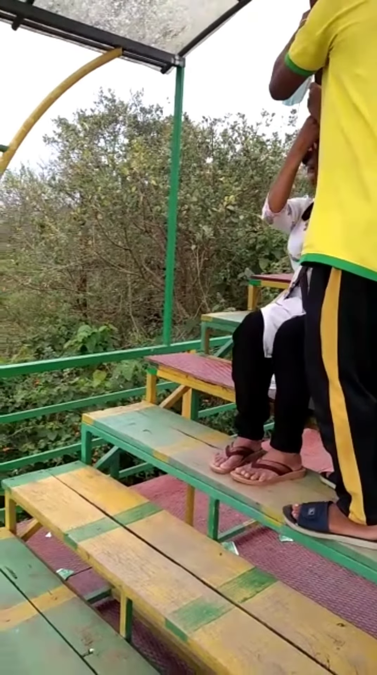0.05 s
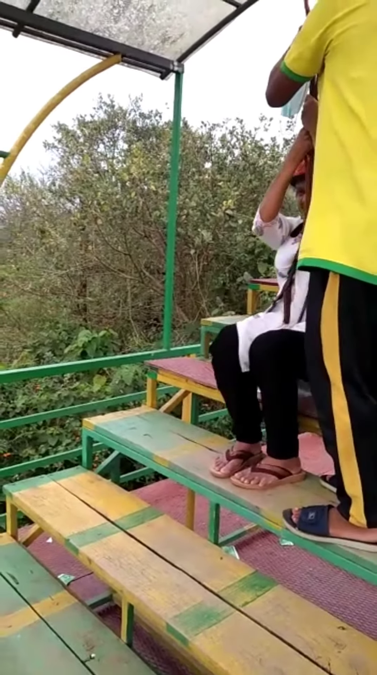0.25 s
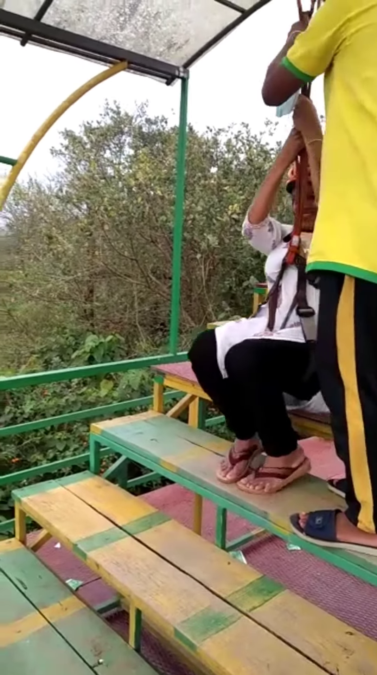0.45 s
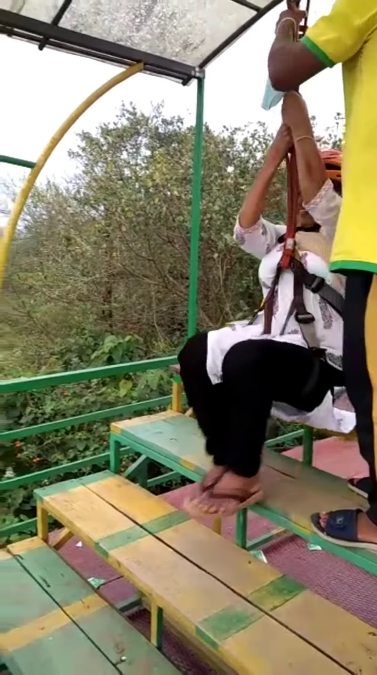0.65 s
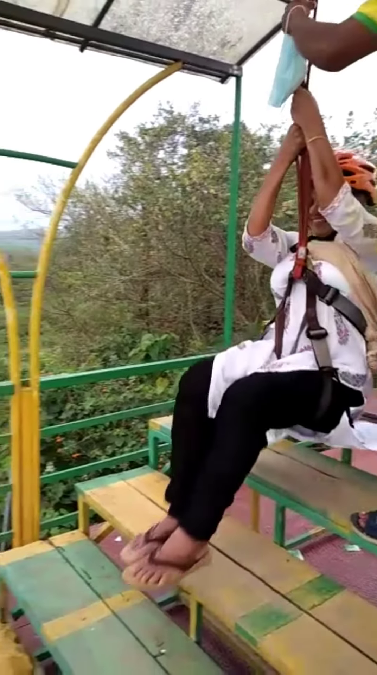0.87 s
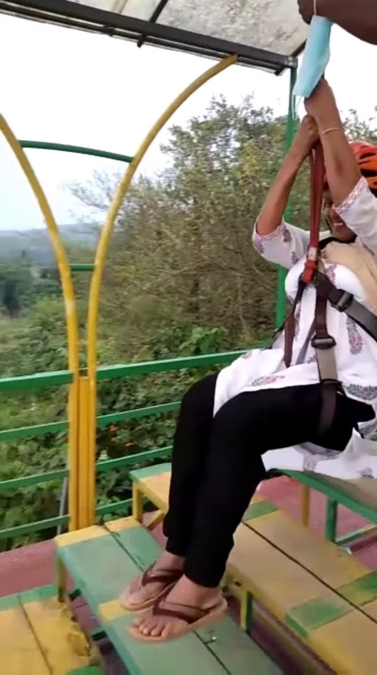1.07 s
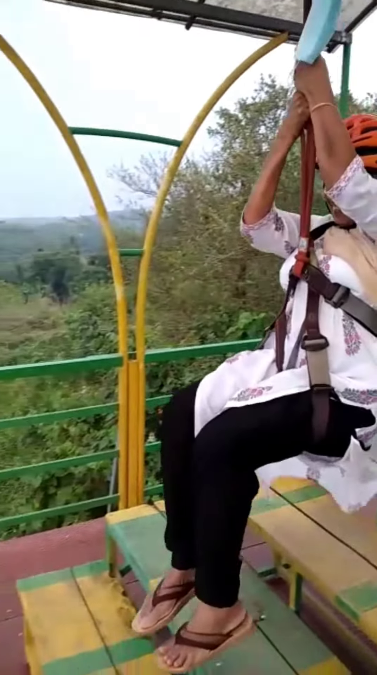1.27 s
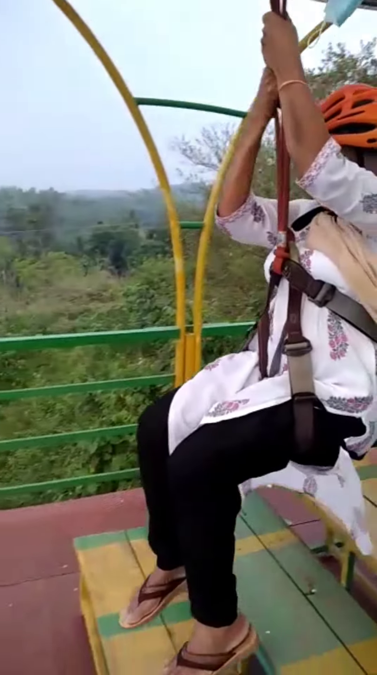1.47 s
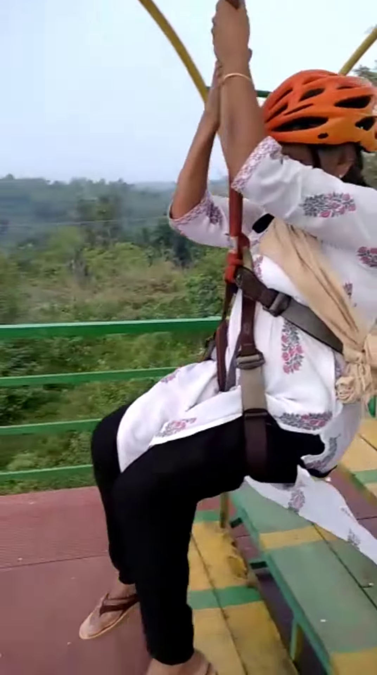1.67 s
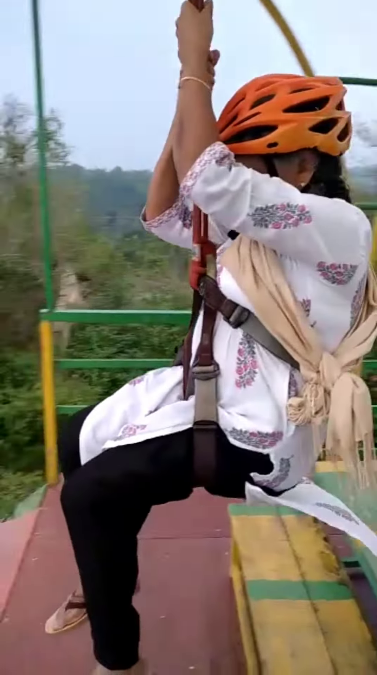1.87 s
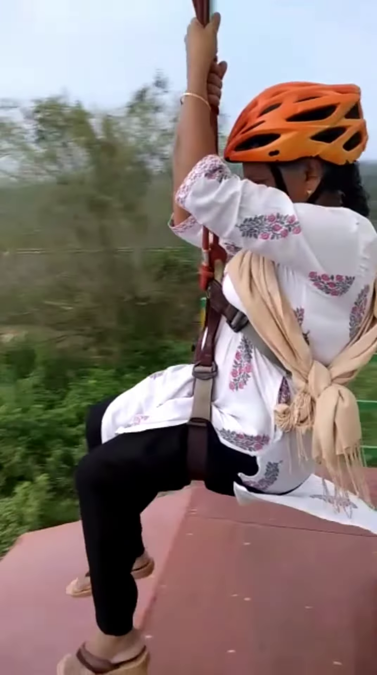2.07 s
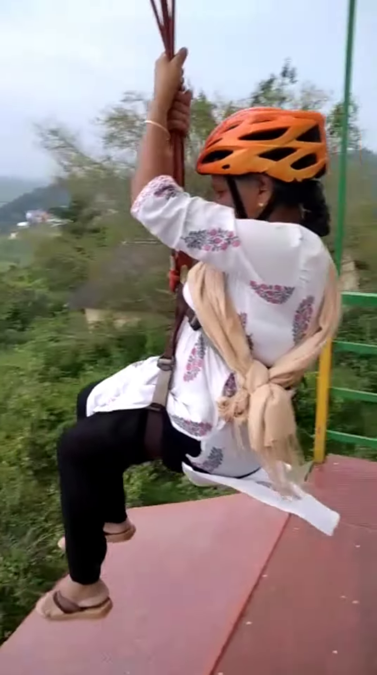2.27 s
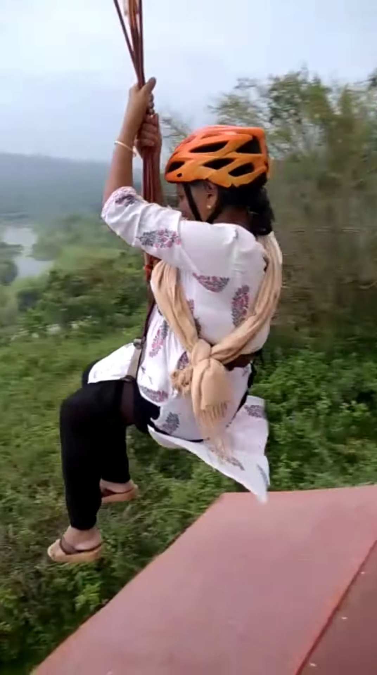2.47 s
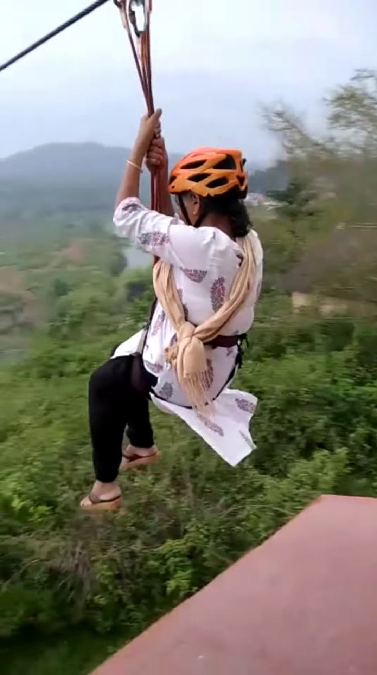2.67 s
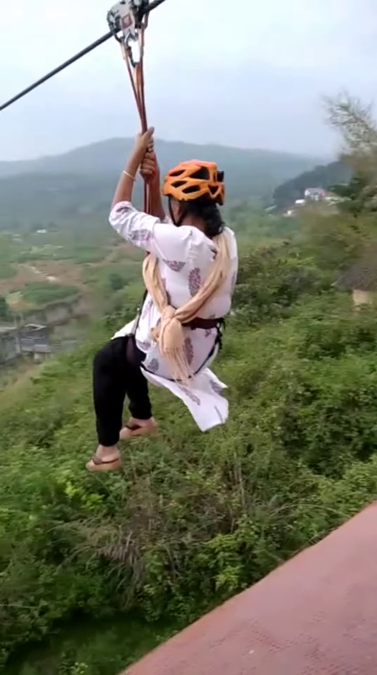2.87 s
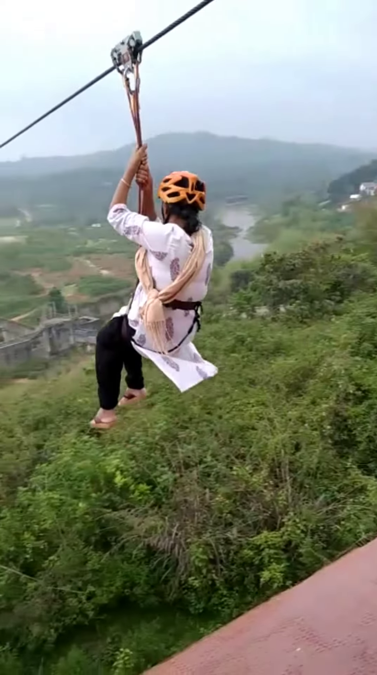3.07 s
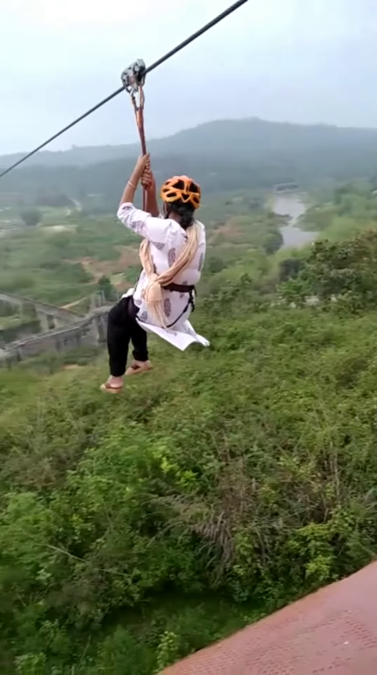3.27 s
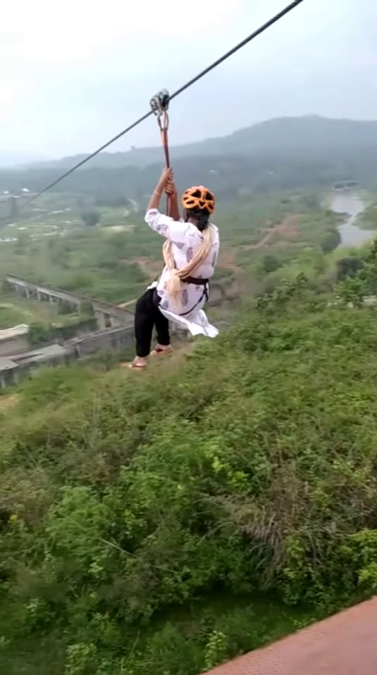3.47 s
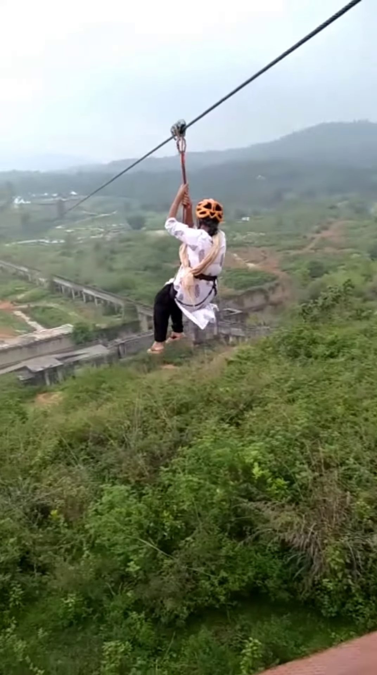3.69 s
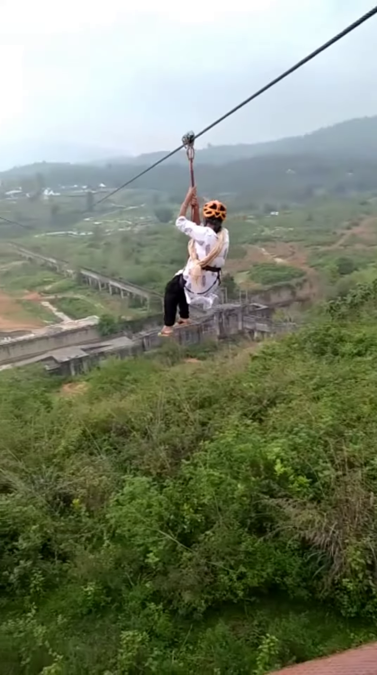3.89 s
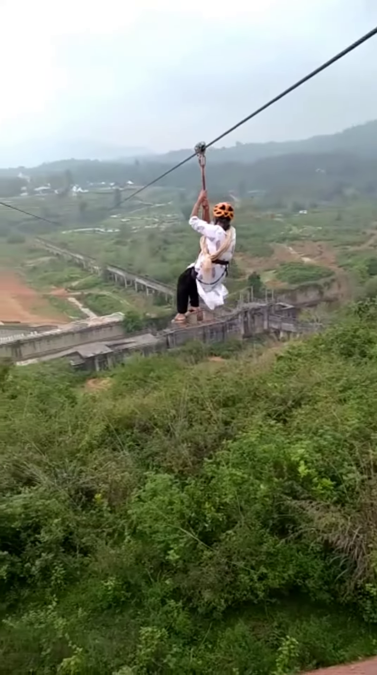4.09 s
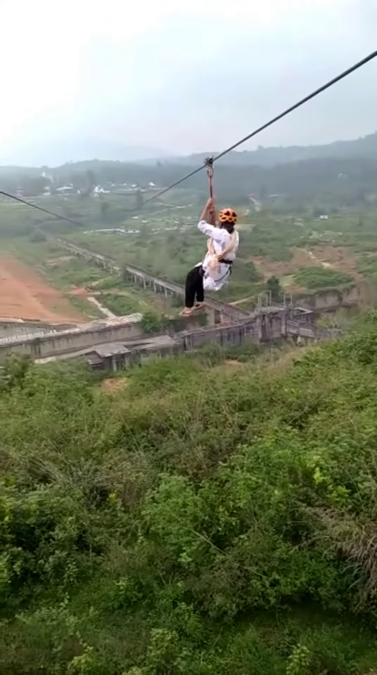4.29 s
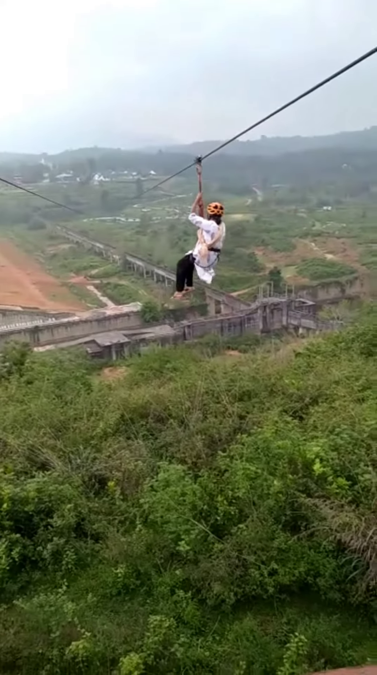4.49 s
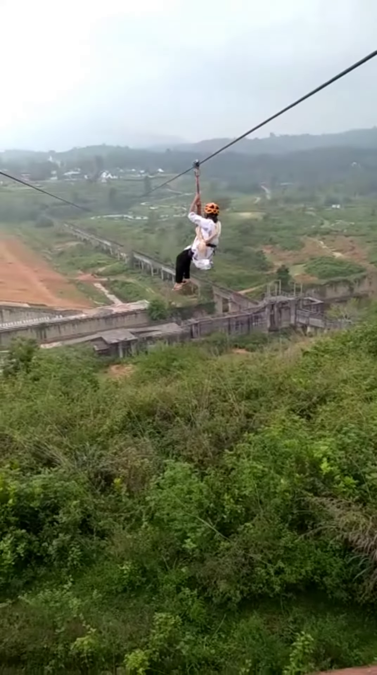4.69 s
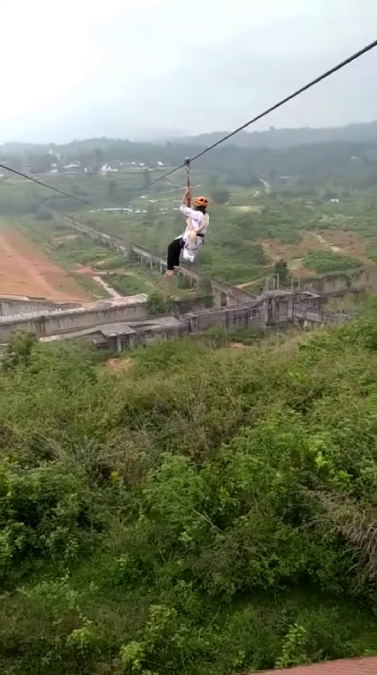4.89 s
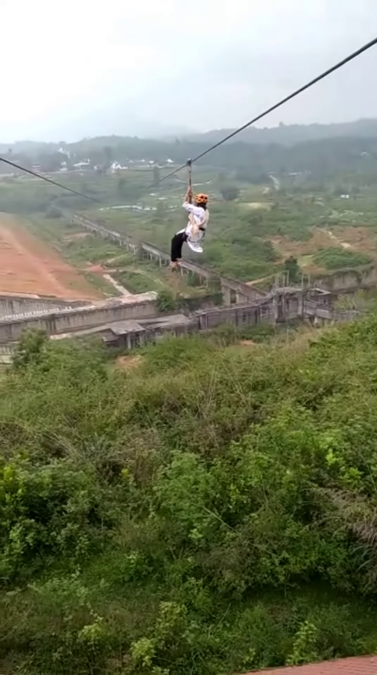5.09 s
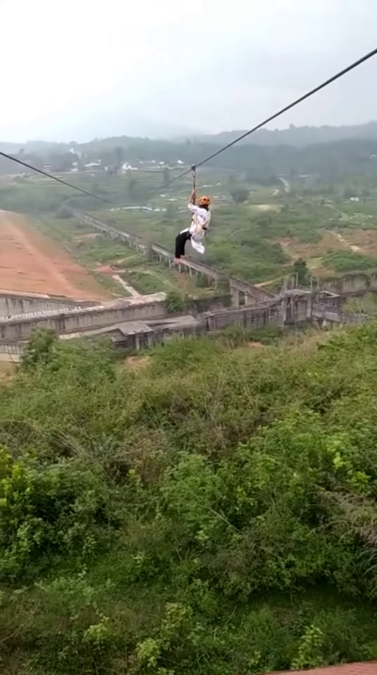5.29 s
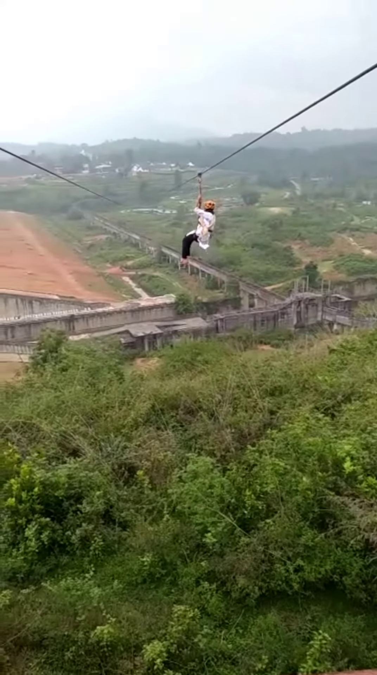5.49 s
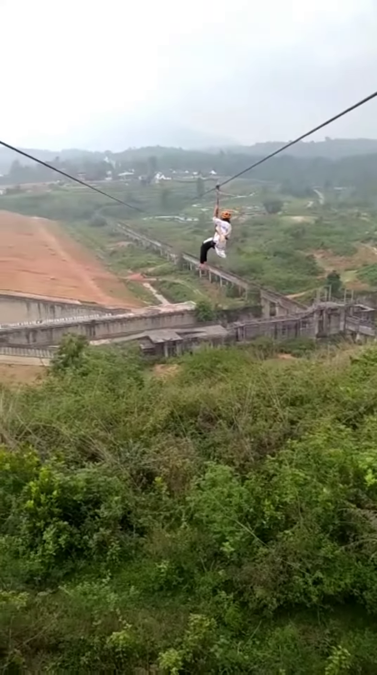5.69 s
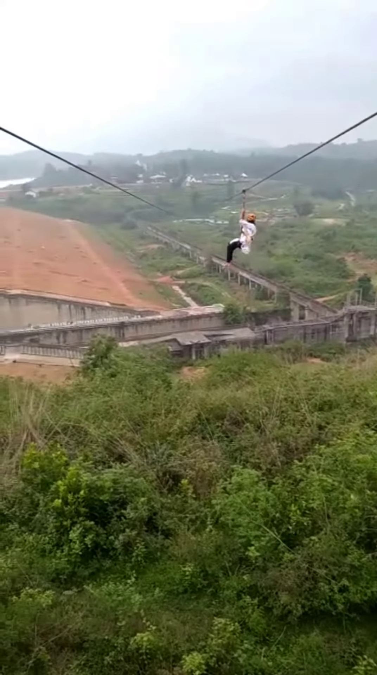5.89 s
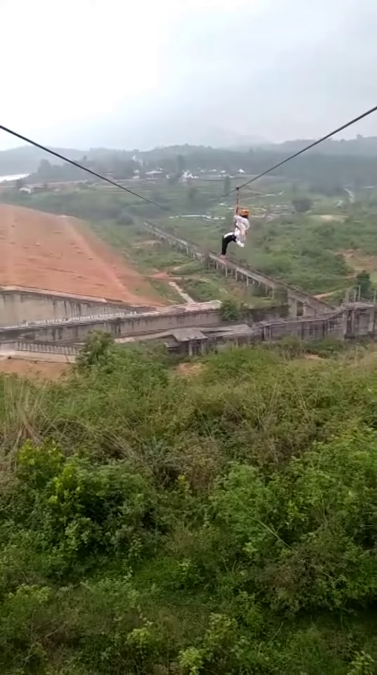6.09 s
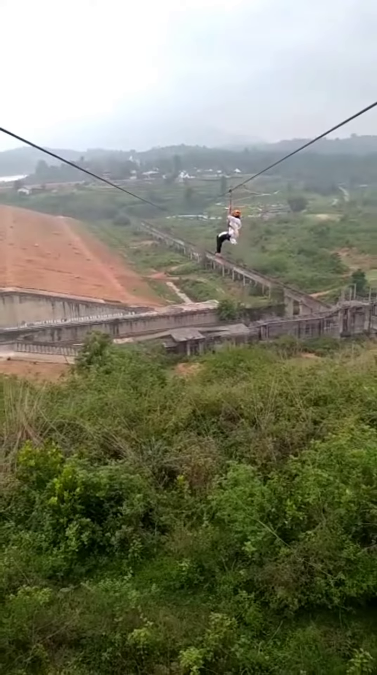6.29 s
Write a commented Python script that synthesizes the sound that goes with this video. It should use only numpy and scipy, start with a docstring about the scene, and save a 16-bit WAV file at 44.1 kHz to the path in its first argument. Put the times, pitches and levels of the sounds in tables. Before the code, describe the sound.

A zip line trolley ticks off along a steel cable, its ticks quickening into a bright metallic hiss that sings down the span, outdoors.

```python
"""Under a roofed platform, harness and clothes rustle, then a bird whistles one swooping phrase.
The zip line trolley rolls off: its sheaves tick over the strands of a steel cable, faster and faster.
Side plates and hanger ring as they pass the microphone at 1.1 m; soft knocks ring the modes of the deck.
The ticks merge into a hiss, coloured by cable resonances from ever farther down the span; a faint hum rises.
Throughout there is open air, a breeze gusting on the microphone, and insects as throbbing bands of noise."""
import sys
import numpy as np
from scipy import signal
from scipy.fft import rfft, irfft, next_fast_len
from scipy.io import wavfile
from scipy.ndimage import uniform_filter1d, map_coordinates

SR = 44100
rng = np.random.default_rng(int(sys.argv[2]) if len(sys.argv) > 2 else 0)


def transcribe(u):
    """Save the signal u as a 16-bit wav file named by the first command-line argument.

    u: samples, shape (n,) or (channels, n), limited to [-1, 1]; the rate is SR.
    q: integer samples, one column per channel.
    """
    v = np.clip(np.atleast_2d(u).T, -1, 1)
    q = np.round(v * 32767).astype(np.int16)
    wavfile.write(sys.argv[1], SR, q)


N = 279831

# All side_db values are left above right; a swell's length_s is taken at half height (in dB).
# Speed of the trolley, briefly checked just after the push-off: time_s, strands_per_s
SPEED = [(0.387, 20.7), (0.521, 53.3), (0.82, 76), (0.87, 53), (0.94, 55), (1.1, 107), (2.0, 173),
         (3.3, 289), (5.1, 415), (5.8, 434), (6.35, 480)]
# Where the hiss comes from: time_s, reach (0 trolley, 1 first stretch of cable, 2 far down the span)
REACH = [(0.5, 0.4), (1.8, 0.062), (2.15, 0.3), (2.5, 0.6), (3.2, 0.9), (4.0, 1.004), (4.6, 1.13),
         (5.5, 1.55)]
# Direction of the cable sound, on top of the sides of its colours: time_s, side_db
HEADING = [(0.5, -5), (1.3, -5), (2.2, -3), (2.8, -5), (3.5, -3), (4.3, -1.1), (5.2, -1.5), (6.3, -2)]
# Single hard contacts of sheave and strand: start_s, strength_db (before the crack and tail offsets)
HARD_CONTACTS = [(0.3862, -50), (0.4257, -66), (0.4585, -41.5), (0.48, -41), (0.501, -47), (0.5205, -39),
                 (0.544, -40), (0.56, -37), (0.5936, -36.5), (0.6267, -44), (0.658, -37), (0.675, -42),
                 (0.7189, -47), (0.747, -51), (0.7755, -52), (0.8028, -61), (0.831, -36), (0.8966, -52),
                 (0.9146, -48), (0.953, -40), (0.968, -40), (0.9845, -48), (1.0281, -37), (1.053, -33),
                 (1.0768, -31), (1.1, -33), (1.1908, -36), (1.47, -33), (2.283, -28), (2.614, -42),
                 (2.646, -35), (3.307, -41), (3.555, -33), (5.169, -37), (5.199, -29), (5.466, -32),
                 (5.9526, -37)]
# Colour of the steel at the three reaches, relative: frequency_hz, density_db (per Hz)
NEAR_COLOUR = [(1000, -14.5), (1550, -12.5), (2270, -5.5), (2480, 1), (2870, 4.5), (3100, 2), (3400, 3),
               (4300, 0), (5210, -4.5), (7570, 12.5), (8400, 18.5), (9610, 12), (14300, -0.5)]
MIDWAY_COLOUR = [(410, -26), (700, -25.5), (901, -14), (1150, -14.5), (1520, -8), (2210, -2), (2700, -4.5),
                 (3350, -2.5), (6690, -4), (8090, 2.5), (14300, -25.5)]
FAR_COLOUR = [(410, -31), (770, -39), (878, -16.5), (1440, -14.5), (2260, -6.5), (3650, -7.5), (4420, 0.5),
              (6290, -5), (7410, -2.5), (8620, -7), (14300, -31)]
# Stereo side of the steel at the trolley and along the cable: frequency_hz, side_db
NEAR_SIDE = [(1000, 11.5), (2000, 11), (3100, 4.5), (4300, 7), (5200, -1.5), (7000, 0), (8500, 1),
             (11000, 5)]
FAR_SIDE = [(700, 1.6), (1300, 5.3), (2300, 4.2), (3300, 7.5), (4300, 1.8), (6000, 1.3), (7500, 4.6),
            (10000, 4.9), (13000, 4.8)]
# Strong cable resonances, each fed best along one stretch of the ride:
# centre_hz, width_hz, lift_db, strongest_s, length_s, glide_hz_per_s
CABLE_RESONANCES = [(1310, 70, 7.5, 4.8, 1.8, -30), (1524, 55, 4.5, 4.8, 3, -5),
                    (1705, 60, 4, 5.7, 1.6, -5), (1170, 70, 5, 4.1, 1, 40), (2170, 80, 4.5, 3.8, .5, 60),
                    (2320, 75, 6, 4.9, 2.2, -15), (2680, 80, 5.5, 4.8, 2.4, -20),
                    (2885, 110, 4, 2.05, .6, 0), (2935, 70, 7, 5.15, 2, 0), (3380, 140, 4.5, 2.7, .8, 280),
                    (3425, 115, 9, 3.77, .25, 0), (3320, 85, 6.5, 5.3, 2.2, 0),
                    (3800, 80, 6, 5.4, 1.8, -25), (4095, 80, 3.5, 3.4, .8, 0), (4172, 30, 6.5, 5.3, 2.2, 0),
                    (4420, 105, 8.3, 5.2, 2.7, -5), (4750, 100, 4, 2.85, .7, 200),
                    (4865, 80, 7, 4.3, .7, -70), (4800, 60, 5, 5.7, 1.5, -50), (5155, 75, 5, 4.1, 1, -30),
                    (5525, 90, 7, 4.95, 1.5, -45), (5829, 35, 5, 5.7, 2.2, 0), (6685, 65, 4, 5.3, 2.2, -20),
                    (7180, 70, 4.5, 5.7, 1.6, -30), (7440, 85, 6.5, 5.6, 1.7, -40),
                    (8020, 90, 5, 3.95, .45, 0), (8420, 170, 3, 1.6, 1, 0),
                    (8650, 120, 4.5, 5.7, 1.3, -120)]
# Resonances of the side plates and of the hanger, relative: pitch_hz, width_hz, level_db
PLATE_MODES = [(1480, 24, -3), (1775, 34, 5.5), (1901, 39, 11), (2046, 71, 8)]
HANGER_MODES = [(134, 24, -8.5), (271, 58, -6), (397, 65, -1.5), (660, 41, 3.5), (870, 93, 2.5),
                (953, 30, 9.5), (1320, 180, 2)]
# The rider sways and the sheaves scrape harder, mostly in the sizzle: centre_s, length_s, lift_db
SCRAPES = [(0.858, 0.17, 4.5), (1.087, 0.46, 3), (1.477, 0.04, 4), (1.617, 0.12, 3), (2.25, 0.45, 3.5),
           (2.612, 0.16, 4.5), (2.96, 0.062, 2), (3.313, 0.079, 3), (4.257, 0.048, 3), (4.906, 0.014, 3),
           (5.09, 0.015, 6), (5.19, 0.046, 3.5), (5.27, 0.022, 3.5), (5.359, 0.026, 3),
           (5.465, 0.0099, 4.5), (5.527, 0.064, 2.5), (5.95, 0.11, 2.5), (6.135, 0.15, 0.5)]
# Spells of sheave hum: centre_s, length_s, level_db
HUMS = [(5.52, 0.22, -75), (5.88, 0.21, -69.5), (6.25, 0.29, -70)]
# Soft knocks on the deck: start_s, push_db (before filter and modes), softness_cutoff_hz
KNOCKS = [(2.084, -55, 300), (2.136, -60, 250), (2.66, -61, 300), (3.848, -57, 905), (3.859, -59, 1000),
          (3.8672, -57, 5000), (3.877, -54.5, 900), (3.893, -53.5, 300), (3.921, -58, 110)]
# Modes of the deck, gain relative to the push: pitch_hz, gain_db, t60_s
DECK_MODES = [(41.5, -7, 0.15), (113, -40, 0.23), (155, -1.5, 0.26), (216, -1.5, 0.15), (540, 5, 0.056),
              (890, 2.5, 0.068), (1370, 7, 0.028), (2150, 22.5, 0.021)]
# The bird's phrase: time_s, pitch_hz, level_db
WHISTLE = [(0.31, 1470, -78), (0.336, 1505, -57.5), (0.4, 1415, -70.5), (0.454, 1460, -59.5),
           (0.53, 1670, -60), (0.564, 1687, -67), (0.614, 1600, -55), (0.66, 1396, -64), (0.69, 1260, -71)]
# Colour of the open air, relative: frequency_hz, density_db (per Hz)
AIR_COLOUR = [(35, -4.5), (60, -9), (242, -7), (375, -6), (450, -6.5), (528, -14.5), (664, -12.5),
              (3010, -20.5), (9240, -18), (14300, -34)]
# Bands of insects: centre_hz, width_hz, level_db (before the throb)
INSECTS = [(5500, 230, -83), (9200, 1300, -75)]
# Gusts on the microphone: centre_s, length_s, lift_db
GUSTS = [(0.158, 0.11, 12), (2.193, 0.31, 9.5), (3.98, 0.34, 8.5), (4.8, 0.97, 6), (6.001, .35, 3)]
# Likeness of the two channels: frequency_hz, likeness (0-1)
LIKENESS = [(150, 0.86), (500, 0.06), (1300, 0.29), (2200, 0), (3500, 0), (5500, 0), (9000, 0.09),
            (13000, 0)]

# rolling fades below a crawl; the levels hold at cruise and grow with each doubling of speed
CRUISE_PER_S, CRAWL_PER_S, CRAWL_STEEPNESS = 263, 83.3, 4.3
HISS_DB, HISS_DB_PER_OCTAVE = -40.5, 1.5
SIZZLE_DB, SIZZLE_DB_PER_OCTAVE = -43, 4.5
# change of level while only the trolley radiates, not yet the span
NEAR_HISS_DB, NEAR_SIZZLE_DB = -5.5, 0.43
SCRAPE_HISS_SHARE = 0.77  # of the sizzle's lift in dB
# each strand's bump dies away; bumps differ a little in strength; grit is shorter
STRAND_T60_S, STRAND_SPREAD_DB, GRIT_T60_S = 0.043, 1.4, 0.008
# a hard contact cracks, then a tail dies away: offsets from its strength, and decay times
CRACK_DB, CRACK_T60_S, TAIL_DB, TAIL_T60_S = -4, 0.007, -7.5, 0.04
# the rear sheave: its delay and its share of contact power
REAR_LAG_S, REAR_SHARE = 0.0034, 0.38
# share of the sizzle's power that rings on, and for how long
RING_ON_SHARE, RING_ON_T60_S = 0.15, 0.2
# weak cable resonances: spacing, lifetime, depth, and the fraction of pitch they sink per second
CROWD_HZ, CROWD_S, CROWD_DB, SAG_PER_S = 55, 0.4, 2.1, 0.003
# path past the microphone: travel per strand, moment and distance of the closest approach
STRAND_M, PASS_S, PASS_M = 0.0051, 2.23, 1.1
# trolley parts: level at the pass, growth with speed, loss as they turn away behind the rider
PLATE_DB, PLATE_DB_PER_OCTAVE, PLATE_LOSS_DB_PER_M = -42, 7.5, 7.5
HANGER_DB, HANGER_DB_PER_OCTAVE, HANGER_LOSS_DB_PER_M = -54, 5, 11
# the rider's body comes between plates and microphone: midpoint, time scale, final loss
SHADOW_S, SHADOW_TAKES_S, SHADOW_DB = 2.34, 0.05, 8
# the hum's octave: mean level against the hum, and spread of its waver
HUM_OCTAVE_DB, HUM_WAVER_DB = -9, 1.5
RUSTLE_S, RUSTLE_LENGTH_S, RUSTLE_DB = 0.097, 0.19, -68.5
AIR_DB, CALM_BREEZE_DB = -70, -74.5
CUTOFF_HZ = 14380


def contact(rub=1.0, rub_full_per_s=150, grit_per_s=220, grit_spread_db=3.0, grit=0.39):
    """Force at the sheaves, rms 1 once under way: a bump per strand, bursts of grit and an even rub."""
    strands_per_s = speed()
    crossed = np.diff(np.ceil(np.cumsum(strands_per_s) / SR), prepend=0)
    strength = from_db(STRAND_SPREAD_DB * rng.standard_normal(N))
    # powers fade with half the T60, so that their square roots fade with the full one
    bumps = both_sheaves(smeared(fade(crossed * strength ** 2, STRAND_T60_S / 2)))
    grit_size = from_db(grit_spread_db * np.minimum(rng.exponential(1, N), 2.9))
    grit_hits = rng.random(N) < grit_per_s / SR
    bursts = fade(grit_hits * grit_size ** 2, GRIT_T60_S / 2)
    # grit and rub grow with speed and fill the gaps between the bumps
    growth = np.minimum(strands_per_s / rub_full_per_s, 1) ** 2
    filling = growth * (grit * bursts / bursts.mean() + rub)
    power = bumps / (uniform_filter1d(bumps, size=6000) + 1e-9) + filling
    under_way = 1 / (1 + (CRAWL_PER_S / (strands_per_s + 1e-3)) ** CRAWL_STEEPNESS)
    return np.sqrt(under_way * power / (uniform_filter1d(power, size=9000) + 1e-9))


def ticks():
    """Force of the single hard contacts: a short crack, then a tail that dies away along the cable."""
    clicks = np.zeros(N)
    for start_s, strength_db in HARD_CONTACTS:
        clicks[int(start_s * SR)] = from_db(strength_db) ** 2
    tail = smeared(fade(clicks, TAIL_T60_S / 2)) * from_db(TAIL_DB) ** 2
    crack = fade(clicks, CRACK_T60_S / 2) * from_db(CRACK_DB) ** 2
    return np.sqrt(both_sheaves(tail) + crack)


def cable(force, hard, top_flicker_db=1.23):
    """The rolling contact sets the steel hissing, first at the trolley, then along the whole span."""
    hz = bins()
    reach = np.clip(in_time(REACH)[0], 0, 2)
    hiss_db, sizzle_db = rolling_levels(reach)
    depth_db = at_hz([(4500, 1.15), (9000, 1.5)], hz)
    near_db = at_hz(NEAR_COLOUR, hz) + depth_db * ripple(spacing_hz=108.5)
    near = steel_noise(near_db, NEAR_SIDE, lag_ms=0.472)
    midway_db = at_hz(MIDWAY_COLOUR, hz) + depth_db * ripple(spacing_hz=33.87)
    midway = steel_noise(midway_db, FAR_SIDE, lag_ms=0.322)
    far_db = at_hz(FAR_COLOUR, hz) + depth_db * ripple(spacing_hz=30.1)
    far = steel_noise(far_db, FAR_SIDE, lag_ms=0.262)
    # each colour hands its power over to the next
    shares = [np.sqrt(np.clip(1 - abs(reach - k), 0, 1)) for k in range(3)]
    hiss, sizzle = shifting(shares[0] * near + shares[1] * midway + shares[2] * far)
    hiss = hiss * np.hypot(force * from_db(hiss_db), hard)
    sizzle_gain = from_db(sizzle_db + top_flicker_db * drift(21))
    sizzle = sizzle * np.hypot(lingering(force) * sizzle_gain, 0.55 * hard)
    # a thin cable radiates no bass
    thin = signal.butter(3, 600, "high", fs=SR, output="sos")
    return signal.sosfilt(thin, hiss + sizzle) * pan(in_time(HEADING)[0])


def trolley(force, hard, plate_side_db=4.5, tick_ring_db=-26.0, plate_waver_db=1.5):
    """Plates and hanger ring under the same force; the plates turn away as the rider passes."""
    shake = stereo_noise(lag_ms=.47, diffuse=.08)
    # small plates radiate only in a narrow band
    narrow = signal.butter(4, [1500, 2230], "band", fs=SR, output="sos")
    ringing = resonate(shake, PLATE_MODES)
    ringing = ringing / signal.sosfilt(narrow, ringing.mean(axis=0)).std()
    shadow_db = SHADOW_DB * (1 + np.tanh((np.arange(N) / SR - SHADOW_S) / SHADOW_TAKES_S)) / 2
    rolling = force * from_db(PLATE_DB - shadow_db + plate_waver_db * drift(23))
    drive = np.hypot(rolling, hard * from_db(tick_ring_db))
    pass_gain = passing(PLATE_DB_PER_OCTAVE, PLATE_LOSS_DB_PER_M)
    plates = signal.sosfilt(narrow, ringing * drive * pass_gain) * pan(plate_side_db)
    dull = signal.butter(4, 1250, fs=SR, output="sos")
    hanger = signal.sosfilt(dull, resonate(shake * force, HANGER_MODES))
    hanger = hanger / hanger.std() * from_db(HANGER_DB)
    return plates + hanger * passing(HANGER_DB_PER_OCTAVE, HANGER_LOSS_DB_PER_M)


def sheave_hum():
    """At speed the twist of the cable gives a faint rising note, one cycle every two strands."""
    phase = np.pi * np.cumsum(speed()) / SR
    level = sum(from_db(level_db) * swell(s, length_s) for s, length_s, level_db in HUMS)
    octave = from_db(HUM_OCTAVE_DB + HUM_WAVER_DB * drift(9.6)) * np.sin(2 * phase)
    return np.sqrt(2) * level * (np.sin(phase) + octave)


def rustle(low_hz=900, high_hz=10000):
    """Clothes and harness rustle as the rider sits back: one swell of band-shaped noise."""
    hz = bins()
    colour = hz / (hz + low_hz) / (1 + (hz / high_hz) ** 2)
    cloth = rms_one(shaped(stereo_noise(lag_ms=.47), colour))
    return cloth * swell(RUSTLE_S, RUSTLE_LENGTH_S) * from_db(RUSTLE_DB)


def knocks():
    """Soft pushes, low-passed by their softness, ring the damped modes of the deck."""
    push, ringing = np.zeros(N), 0
    for start_s, push_db, soft_hz in KNOCKS:
        blow = from_db(push_db) * signal.unit_impulse(N, int(start_s * SR)) + 1e-18
        push += signal.sosfilt(signal.butter(1, soft_hz, fs=SR, output="sos"), blow)
    for hz, gain_db, t60_s in DECK_MODES:
        r, w = 1e-3 ** (1 / (t60_s * SR)), 2 * np.pi * hz / SR
        mode = signal.lfilter([0, np.sin(w)], [1, -2 * r * np.cos(w), r * r], push)
        ringing = ringing + from_db(gain_db) * mode
    return ringing


def bird():
    """One pure, swooping whistle: a single sine that follows the pitch curve, in the centre."""
    pitch_hz, level_db = in_time(WHISTLE)
    phase = 2 * np.pi * np.cumsum(uniform_filter1d(pitch_hz, size=900)) / SR
    level = from_db(level_db) * during(WHISTLE, rise=0.0038, fall=.015)
    return np.sqrt(2) * level * np.sin(phase)


def outdoors(breeze_hz=65, insect_side_db=5.5, throb_db=3.5):
    """Open air, a gusting low breeze on the microphone and the throbbing noise bands of insects."""
    hz = bins()
    air = from_db(AIR_DB) * rms_one(shaped(stereo_noise(lag_ms=0), from_db(at_hz(AIR_COLOUR, hz))))
    breeze_colour = hz / (hz + 20) / (1 + (hz / breeze_hz) ** 2)
    breeze = rms_one(shaped(stereo_noise(lag_ms=0), breeze_colour))
    gust_db = sum(lift_db * swell(s, length_s) for s, length_s, lift_db in GUSTS)
    shrill = 0
    for centre_hz, width_hz, level_db in INSECTS:
        throb = from_db(level_db + throb_db * drift(7))
        band = np.exp(-(2 * (hz - centre_hz) / width_hz) ** 2)
        shrill = shrill + throb * rms_one(shaped(rng.standard_normal((2, N)), band))
    return air + breeze * from_db(CALM_BREEZE_DB + gust_db) + shrill * pan(insect_side_db)


def speed():
    """Strands crossed per second; none before the push-off."""
    return np.interp(np.arange(N) / SR, *np.transpose(SPEED), left=0)


def rolling_levels(reach):
    """Hiss and sizzle in dB: both follow the speed and swell with each scrape."""
    octaves = np.log2((speed() + 1) / CRUISE_PER_S)
    scrape_db = sum(lift_db * swell(s, length_s) for s, length_s, lift_db in SCRAPES)
    near = np.clip(1 - reach, 0, 1)
    hiss_db = HISS_DB + HISS_DB_PER_OCTAVE * octaves + NEAR_HISS_DB * near
    sizzle_db = SIZZLE_DB + SIZZLE_DB_PER_OCTAVE * octaves + NEAR_SIZZLE_DB * near
    return hiss_db + SCRAPE_HISS_SHARE * scrape_db, sizzle_db + scrape_db


def both_sheaves(power):
    """The rear sheave repeats each contact of the front one a moment later."""
    lag = int(REAR_LAG_S * SR)
    return (1 - REAR_SHARE) * power + REAR_SHARE * np.pad(power, (lag, 0))[:N]


def smeared(power):
    """The cable softens the attack of a contact a little."""
    smear = np.exp(-1 / (.0008 * SR))
    return signal.lfilter([1 - smear], [1, -smear], power)


def lingering(force):
    """The highest modes of the steel ring on between contacts."""
    tail = fade(force ** 2, RING_ON_T60_S / 2) * np.log(1e6) / (RING_ON_T60_S * SR)
    return np.sqrt((1 - RING_ON_SHARE) * force ** 2 + RING_ON_SHARE * tail)


def steel_noise(colour_db, side, lag_ms):
    """The crowd of steel modes as a lower (hiss) and an upper (sizzle) half, each of rms 1."""
    hz = bins()
    noise = stereo_noise(lag_ms, scatter=.4)
    gains = from_db(colour_db) * pan(at_hz(side, hz))
    upper = 1 / (1 + (6500 / (hz + 1)) ** 16)
    return np.array([rms_one(shaped(noise, gains * half)) for half in (1 - upper, upper)])


def shifting(x):
    """Cable resonances swell, glide and fade on the ride: strong ones from the table, a crowd by chance."""
    hz, s, frames = signal.stft(x, SR, nperseg=2048, noverlap=1024)
    hz = hz[:, None]
    strong_db = 0
    for centre_hz, width_hz, lift_db, strongest_s, length_s, glide in CABLE_RESONANCES:
        since_s = s - strongest_s
        feed = 2 ** -np.minimum((2 * since_s / length_s) ** 2, 60)
        peak = 1 / (1 + (2 * (hz - centre_hz - glide * since_s) / width_hz) ** 2)
        strong_db = strong_db + lift_db * feed * peak
    place = np.broadcast_arrays(hz * (1 + SAG_PER_S * s) / CROWD_HZ, s / CROWD_S)
    crowd = map_coordinates(rng.standard_normal((512, 32)), place, order=3, mode="mirror")
    gain = from_db(strong_db + CROWD_DB * crowd * np.clip(hz / 900 - 0.3, 0, 1))
    # the resonances gather the power of their neighbourhood
    gain = gain / np.sqrt(uniform_filter1d(gain ** 2, size=60, axis=0))
    return signal.istft(frames * gain, SR, nperseg=2048, noverlap=1024)[1][..., :N]


def passing(db_per_octave, loss_db_per_m):
    """Gain of a trolley part, about 1 at the pass: up with speed, down with distance and turning away."""
    strands_per_s, closest = speed() + 1, int(PASS_S * SR)
    travel_m = STRAND_M * np.cumsum(strands_per_s) / SR
    past_m = travel_m - travel_m[closest]
    speed_db = db_per_octave * np.log2(strands_per_s / strands_per_s[closest])
    turned_db = loss_db_per_m * np.maximum(past_m, 0)
    return from_db(speed_db - turned_db) * PASS_M / np.hypot(past_m, PASS_M)


def resonate(x, modes):
    """Parallel resonances with alternating signs."""
    out = 0
    for k, (hz, width_hz, level_db) in enumerate(modes):
        r = np.exp(-np.pi * width_hz / SR)
        poles = [1, -2 * r * np.cos(2 * np.pi * hz / SR), r * r]
        gain = (-1) ** k * from_db(level_db) * (1 - r * r) / 2
        out = out + gain * signal.lfilter([1, 0, -1], poles, x)
    return out


def stereo_noise(lag_ms, scatter=0.0, diffuse=0.73):
    """White noise, partly shared by both sides; the left gets the treble late, its phase scattered by echoes."""
    hz = bins()
    alike = np.clip(1 - diffuse * (1 - at_hz(LIKENESS, hz)), 0, 1)
    lag_phase = 2 * np.pi * hz * lag_ms / 1000 * np.clip(hz / 500 - 1, 0, 1)
    echo_phase = scatter * ripple(spacing_hz=265.4) * np.clip(hz / 1500 - 1, 0, 1)
    late = np.exp(-1j * (lag_phase + echo_phase))
    shared = rng.standard_normal(N)
    direct = np.array([shaped(shared, np.sqrt(alike) * late), shaped(shared, np.sqrt(alike))])
    return direct + shaped(rng.standard_normal((2, N)), np.sqrt(1 - alike))


def pan(side_db):
    """Left and right gains for a level difference, left above right."""
    return from_db(np.array([[.5], [-.5]]) * side_db)


def ripple(spacing_hz):
    """A random wave along the frequency axis, as from many crowded modes or echoes."""
    return np.interp(bins() / spacing_hz, np.arange(4096), rng.standard_normal(4096))


def swell(s, length_s):
    """A smooth rise and fall of height 1 around a moment; its length is taken at half height."""
    return 2 ** -np.minimum((2 * (np.arange(N) / SR - s) / length_s) ** 2, 60)


def drift(rate_hz):
    """Slow chance with spread 1: noise at one value per 40 samples, low-passed and interpolated."""
    r = np.exp(-80 * np.pi * rate_hz / SR)
    noise = rng.standard_normal(N // 40 + 2002)
    slow = signal.lfilter([1], [1, -2 * r, r * r], noise)[2000:]
    return np.interp(np.arange(N) / 40, np.arange(len(slow)), rms_one(slow))


def fade(clicks, t60_s):
    """Each click becomes a step that dies away."""
    return signal.lfilter([1], [1, -1e-3 ** (1 / (t60_s * SR))], clicks + 1e-18)


def in_time(rows):
    """Each column of a curve at every sample."""
    s, *columns = np.transpose(rows)
    return [np.interp(np.arange(N) / SR, s, c) for c in columns]


def during(rows, rise, fall):
    """1 while a curve lasts, fading exponentially on both sides."""
    t = np.arange(N) / SR
    before_s, after_s = np.minimum(t - rows[0][0], 0), np.maximum(t - rows[-1][0], 0)
    return np.exp(before_s / rise - after_s / fall)


def at_hz(points, hz):
    """Read a spectrum on a log-frequency axis."""
    return np.interp(np.log(hz + 1), np.log(np.array(points)[:, 0]), np.array(points)[:, 1])


def bins():
    """Frequencies of the spectral grid in Hz."""
    return np.fft.rfftfreq(2 * next_fast_len(N // 2 + 1), 1 / SR)


def shaped(x, gain):
    """Filter by a gain on the spectral grid."""
    size = 2 * (gain.shape[-1] - 1)
    return irfft(rfft(x, size) * gain)[..., :N]


def rms_one(x):
    """Scale so that the mean of the channels has rms 1."""
    return x / np.sqrt(np.mean(np.atleast_2d(x).mean(axis=0) ** 2) + 1e-20)


def from_db(db):
    """Amplitude factor of a level in dB."""
    return 10 ** (np.asarray(db) / 20)


def scene():
    """One rolling contact drives cable and trolley; rider, deck, bird and air surround them."""
    force, hard = contact(), ticks()
    ride = cable(force, hard) + trolley(force, hard) + sheave_hum()
    return ride + rustle() + knocks() + bird() + outdoors()


def record(dry):
    """The top is cut steeply."""
    return signal.sosfilt(signal.ellip(12, .1, 70, CUTOFF_HZ, fs=SR, output="sos"), dry)


dry = scene()
out = record(dry)
transcribe(out)
```